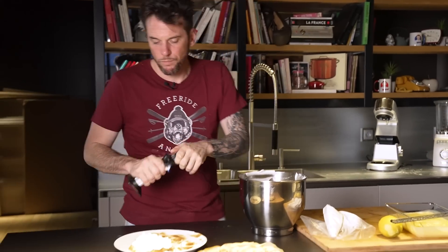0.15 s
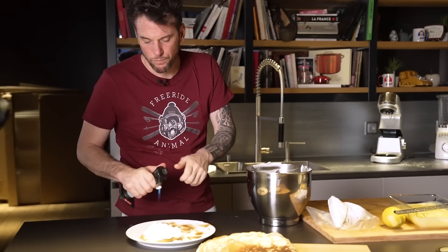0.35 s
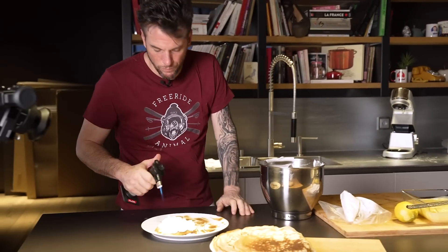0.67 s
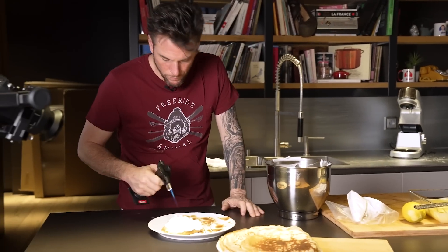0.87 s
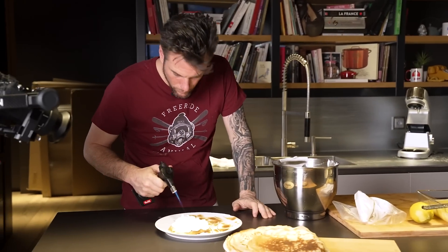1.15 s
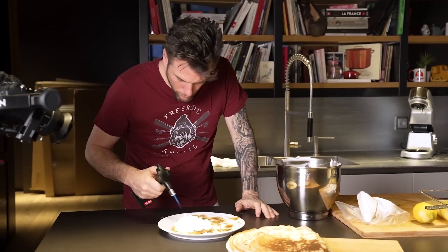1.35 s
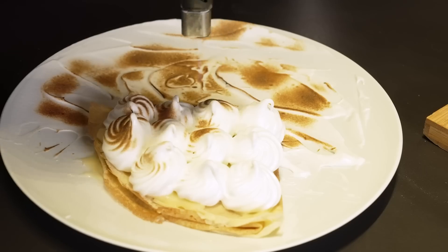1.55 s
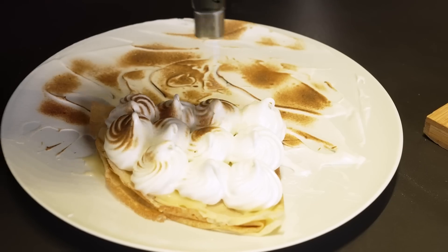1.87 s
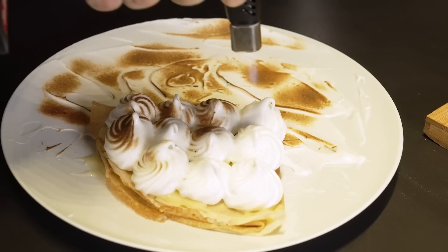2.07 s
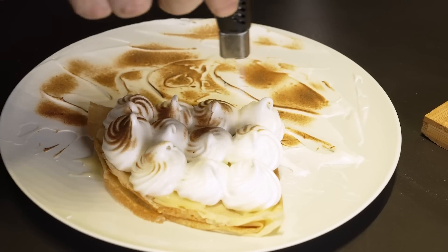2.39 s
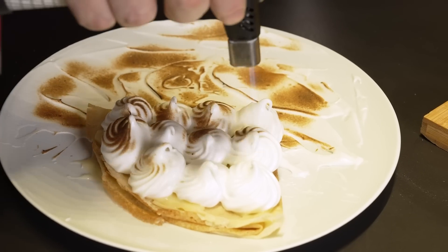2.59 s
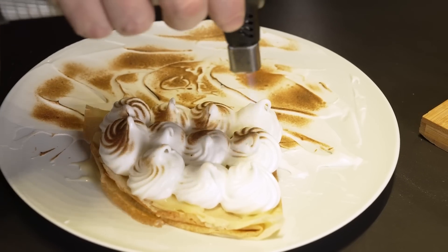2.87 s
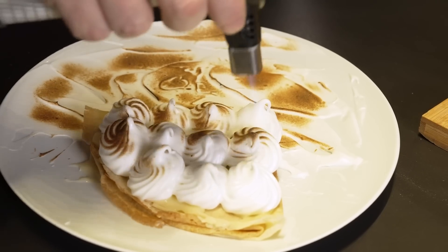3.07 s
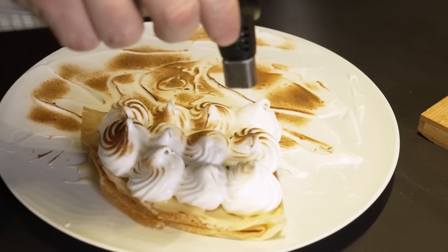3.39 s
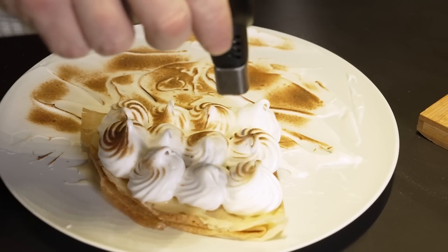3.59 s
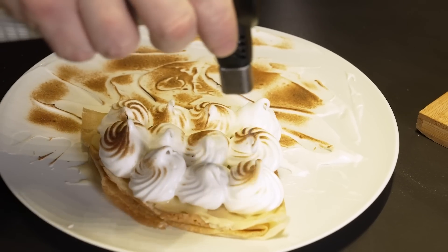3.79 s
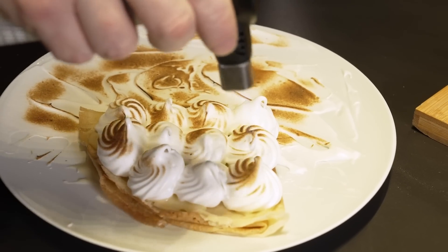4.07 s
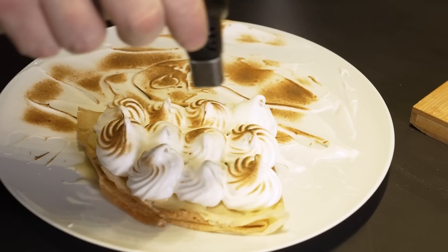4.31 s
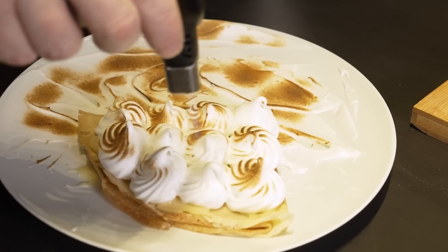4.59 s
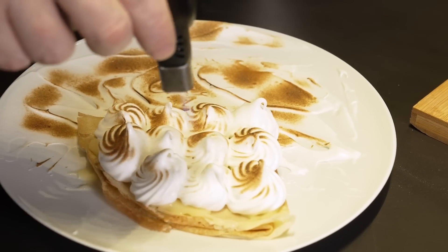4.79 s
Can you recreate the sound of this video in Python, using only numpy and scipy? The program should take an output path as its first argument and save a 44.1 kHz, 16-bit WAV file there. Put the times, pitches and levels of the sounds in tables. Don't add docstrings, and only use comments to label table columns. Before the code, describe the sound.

A small gas torch hisses, its igniter snaps and lights a steady flame, then close-up roaring bursts with little pops brown a topping.

```python
import sys
import numpy as np
from scipy import signal
from scipy.fft import rfft, irfft
from scipy.io import wavfile
from scipy.ndimage import uniform_filter1d

SR = 44100
rng = np.random.default_rng(int(sys.argv[2]) if len(sys.argv) > 2 else 0)


def how_loud(loudness_db):
    steps = np.asarray(loudness_db, float) / 20
    return 10 ** steps


def put_to_file(sound):
    columns = np.atleast_2d(sound).T
    safe = np.clip(columns, -1, 1)
    whole_steps = np.round(safe * 32767)
    wavfile.write(sys.argv[1], SR, whole_steps.astype(np.int16))


N = 218098

LIT_S, CLOSE_S = 0.221, 1.445

# full at t/s, leaves at t/s, roar level/dB, brightness/dB, sweep speed re usual
STRIKES = [(1.503, 1.599, -37, 1.5, 0.65), (1.627, 1.675, -47.5, 3, 0.67), (1.689, 1.762, -37.5, 0.5, 1),
           (1.956, 1.996, -44, 1, 0.78), (2.079, 2.13, -38.5, 1, 0.58), (2.17, 2.338, -37.5, -0.5, 0.24),
           (2.393, 2.606, -36, 0, .72), (2.886, 2.974, -37, -0.5, .7), (2.98, 3.158, -38.5, 0, 0.69),
           (3.489, 3.494, -53.5, 8, 1.3), (3.513, 3.535, -45.5, 1.5, 0.54), (3.563, 3.58, -47.5, 1.5, 0.84),
           (3.836, 3.86, -57, 1, 0.49), (3.999, 4.05, -41, 2, 0.53), (4.064, 4.258, -39, 5, 0.56),
           (4.32, 4.375, -39.5, 5.5, 1.08), (4.448, 4.583, -39.5, 2, 1.6), (4.682, 4.866, -36, 2, 1.14)]
# f/Hz, level/dB (per Hz)
ROAR_TONE = [(53, -45.5), (90, -24), (108, -21.5), (209, -14), (260, -7.5), (431, -8), (618, 0.5),
             (689, -2.5), (786, -4.5), (1000, -10), (1260, -14), (1420, -16), (1600, -17.5), (2080, -79),
             (3520, -120)]
RASP_TONE = [(1350, -43.5), (1600, -1), (1720, -3), (2010, -0.5), (2300, -6.5), (2780, -6), (3250, -10.5),
             (3940, -9), (4500, -16.5), (5850, -54), (9900, -120)]
HISS_TONE = [(2650, -36), (4500, -5), (5070, -2), (5740, -2), (7590, -1), (8550, -2.5), (10200, -4.5),
             (11400, -7), (12700, -7), (14000, -11.5), (15500, -16.5)]
# t/s, level/dB
COUNTER_BOOMS = [(1.64, -56), (1.76, -55), (1.97, -61.5), (2.18, -66), (2.33, -53), (2.53, -73),
                 (2.91, -55), (3.14, -63), (3.55, -64), (4.05, -57.5), (4.3, -51.5), (4.39, -58),
                 (4.47, -54.5), (4.58, -60), (4.7, -63), (4.85, -67)]
# t/s, peak level/dB
POPS = [(1.473, -44), (1.494, -28.5), (1.508, -22.5), (1.549, -26), (1.956, -38), (2.051, -35),
        (2.384, -24.5), (2.418, -30.5), (2.577, -26), (2.714, -45), (2.859, -37.5), (2.959, -37),
        (3.477, -37), (3.505, -36), (3.518, -36), (3.574, -47), (3.993, -24.5), (4.448, -25), (4.574, -27),
        (4.653, -42)]
# t/s, level/dB
HELD_RUMBLE = [
    (0.22, -58),
    (0.36, -53.5),
    (0.41, -58),
    (0.68, -53.5),
    (0.82, -57),
    (0.93, -52.5),
    (1.02, -55.5),
    (1.23, -49),
    (1.45, -52),
]
# f/Hz, level/dB (per Hz)
RUMBLE_TONE = [(53, -26), (90, -11), (156, -4), (391, 0.5), (458, -1.5), (628, -5), (714, -6.5), (852, -9),
               (950, -13.5), (1240, -61), (2090, -120)]
AIR_RUSH_TONE = [(800, -28), (990, -9.5), (1220, 1), (1400, -6.5), (1640, -2.5), (1820, -9.5), (2280, -8.5),
                 (2600, -17), (3120, -20), (3300, -19.5), (4290, -61), (7260, -120)]
COLD_JET_TONE = [(470, -62), (800, -18), (1080, -8), (1330, -13), (1980, -15), (2320, -15), (2760, -17),
                 (3130, -23.5), (5010, -8), (6920, -9.5), (8550, -25), (13900, -13), (15500, -30)]
BURNING_JET_TONE = [(1940, -58), (3300, -21), (3450, -12), (4010, -10.5), (4710, -5), (5610, -10),
                    (6100, -5), (6640, -8), (7610, -6), (8440, -9), (9300, -14.5), (9980, -8.5),
                    (11400, -9), (13400, -9.5), (15500, -16.5)]
# f/Hz, level/dB (per Hz)
IDLE_TONE = [(53, -42), (90, -21), (134, -14), (215, -14), (280, -5), (331, -11), (611, -1.5), (967, -23),
             (1130, -21), (1350, -42), (1630, -25), (2820, -44), (3500, -36), (4550, -64), (7700, -120)]
IDLE_JET_TONE = [(2060, -38), (3500, -29), (3680, -27), (4140, -14.5), (4960, -5), (5340, -11), (5940, -19),
                 (6990, -11.5), (7860, -6.5), (8210, -6.5), (10200, -7.5), (11100, -11), (12200, -9),
                 (13300, -15), (15500, -12)]
# t/s, peak level/dB, knock level re snap/dB, knock f/Hz, room level/dB
CLICKS = [
    (0.133, -57, 18.5, 493, -4),
    (0.185, -47, 13.5, 1570, -6),
    (0.1972, -45, 10, 1400, -20),
    (0.22, -7.5, -3.3, 1450, -9.5),
    (0.445, -46, 17.5, 1386, -6),
    (0.5054, -32.5, 8.5, 1270, -9.5),
    (1.297, -52, 5, 810, 0),
]
# f/Hz, level/dB (per Hz)
SNAP_TONE = [(35, -43), (110, -17), (450, -24), (756, -3), (1420, -14), (2840, -3), (3500, -16.5),
             (5080, 1), (8600, -14), (10300, -0.5), (11300, -10), (12400, -2.5), (13600, -13),
             (15500, -12.5)]
# t/s, middle band f/Hz, top band f/Hz, lift of these/dB, lift of the rim band/dB
TURN = [(0.0, 7350, 14450, 4, 1.5), (0.17, 8400, 14450, -4, 2.5), (0.62, 7960, 14450, 3, 1),
        (0.95, 7750, 13700, -1, 5.5), (1.15, 7550, 13300, 7, 7), (1.44, 7400, 13150, 4, 3),
        (1.7, 6950, 13200, 2.2, 2.5), (2.3, 7600, 13600, 2.5, 2), (2.72, 7900, 13750, 3.5, 5.5),
        (3.1, 7900, 13300, 5, 2), (3.4, 8000, 13600, 8.5, 12), (3.75, 8400, 13300, 4, 1),
        (4.0, 8100, 13200, 0, -0.5), (4.33, 7800, 13950, 1, 11), (4.55, 7600, 14050, 7.5, 8),
        (4.75, 7370, 14200, 10.5, 0), (4.95, 7900, 14050, -1, 0.7)]
# t/s, lower band f/Hz, upper band f/Hz, lift/dB
PLATE = [
    (1.44, 1430, 2600, -1),
    (1.72, 1430, 2500, 0),
    (2.0, 1340, 3020, 1.5),
    (2.5, 1390, 2680, 2),
    (3.15, 1400, 2760, 5),
    (4.1, 1580, 2880, 3),
    (4.38, 1540, 2920, 6),
    (4.47, 1640, 3230, 4),
    (4.7, 1690, 3500, 6.5),
    (4.95, 1630, 3400, 4.5),
]
BAND_WIDTHS = [260, 475, 580, 522, 400, 698, 320, 920]
# f/Hz, time to fall 60 dB/s
WALL_RING = [(100, 1), (1000, 0.33), (4000, 0.34), (15000, 0.33)]
# f/Hz, level/dB (per Hz)
WALL_TONE = [(120, -32), (200, -13), (423, -13), (526, -22), (862, -2.5), (944, -6), (1090, -1),
             (1820, -4.5), (2150, 3.5), (2980, -1), (3710, -6), (4300, 0.5), (12500, -16), (15700, -17)]
# f/Hz, level/dB (per Hz)
FLOOR_TONE = [(12, -27), (20, -3), (32, -7.5), (55, -12), (322, -12.5), (393, -12), (536, -11.5),
              (579, -15.5), (800, -17), (1040, -47), (1760, -120)]
# f/Hz, level/dB
SPREAD_TONE = [(30, -14), (120, -26.5), (400, -31.5), (1500, -34), (4000, -32.5), (15000, -32.5)]


def striking_flame():
    usual_db, lift_off_db, lift_off_s = -38, 2.5, 0.032
    start_s, leaves_s, level_db, bright_db, speed = np.transpose(STRIKES)

    def swelling(t):
        return level_db + lift_off_db * np.exp(-np.maximum(leaves_s - t, 0) / lift_off_s)

    roar_db, which = ramps(start_s, leaves_s, swelling, rise=607 * speed, fall=625 * speed)
    roar_db = np.maximum(roar_db, -62)
    bright_db = uniform_filter1d(bright_db[which], size=900)
    flutter, puffs = drift(16.7), drift(245)

    roar_flicker = 1.2 * flutter + 2.0 * puffs + 2.0 * drift(1260)
    roar = how_loud(roar_db) * turbulence(ROAR_TONE, roar_flicker)

    rasp_db = -54.5 + (roar_db - usual_db) + bright_db
    rasp_flicker = 1.1 * flutter + 1.36 * puffs + 1.4 * drift(33)
    rasp = how_loud(rasp_db) * turbulence(RASP_TONE, rasp_flicker)

    hiss_db = -59.0 + 0.81 * (roar_db - usual_db) + 0.78 * bright_db
    hiss_flicker = 0.92 * flutter + 1.3 * puffs + 0.27 * drift(12)
    hiss = how_loud(hiss_db) * turbulence(HISS_TONE, hiss_flicker)
    return step(CLOSE_S) * (roar + rasp + hiss + counter_boom()) + pops()


def counter_boom():
    s, level_db = np.transpose(COUNTER_BOOMS)
    boom_db, _ = ramps(s, s, lambda t: level_db, rise=300, fall=180)
    return how_loud(np.maximum(boom_db, -74.5)) * rms_one(band_noise(117, 125, N))


def pops():
    clicks = np.zeros(N)
    s, peak_db = np.transpose(POPS)
    clicks[(s * SR).astype(int)] = -how_loud(peak_db - 1.5)
    pulse = coloured(np.arange(SR // 20) == 0, ROAR_TONE)
    return signal.fftconvolve(clicks, pulse / np.abs(pulse).max())[:N]


def held_torch():
    t, lit = np.arange(N) / SR, step(LIT_S)
    rumble_db, = in_time(HELD_RUMBLE)
    rumble = how_loud(rumble_db) * turbulence(RUMBLE_TONE, 0.99 * drift(60) + 1.9 * drift(8.0))

    fade_db = 14 * np.clip(t - LIT_S - 0.56, 0, 0.4)
    rush_db = -57.5 + 0.6 * (rumble_db - rumble_db.mean()) - fade_db
    rush = how_loud(rush_db) * turbulence(AIR_RUSH_TONE, 0.6 * drift(73) + 0.87 * drift(3.4))

    cold_db = -65.5 + 18 * np.minimum(t, LIT_S)
    cold = how_loud(cold_db) * turbulence(COLD_JET_TONE, 0.63 * drift(29.7))
    burning = how_loud(-65.5 + t) * turbulence(BURNING_JET_TONE, 0.5 * drift(30))
    return (lit * (rumble + rush + burning) + (1 - lit) * cold) * (1 - step(CLOSE_S))


def idle_flame():
    rumble = how_loud(-57.5) * turbulence(IDLE_TONE, 0.8 * drift(54) + 1.2 * drift(3.8))
    jet_db = -69 + 0.6 * in_time(PLATE)[-1]
    jet = how_loud(jet_db) * turbulence(IDLE_JET_TONE, 0.91 * drift(30))
    return step(CLOSE_S) * (rumble + jet)


def igniter(room):
    t = np.arange(round(0.014 * SR)) / SR
    dry, sent = np.zeros(N), np.zeros(N)
    for s, peak_db, knock_db, knock_hz, room_db in CLICKS:
        dulling = [(4000, 0), (16000, 0.3 * (peak_db + 9.0))]
        snap = coloured(coloured(rattle(t), SNAP_TONE), dulling)
        knock = np.sin(2 * np.pi * knock_hz * t) * how_loud(-60 * t / 0.015 - 11.5 + knock_db)
        at = round((s - 0.0004) * SR)
        dry[at:at + len(t)] += how_loud(peak_db) * (snap / np.abs(snap).max() + knock)
        sent[at] += how_loud(peak_db + room_db + 16.0)
    return dry + catching_gas() + signal.fftconvolve(sent, room)[:N]


def rattle(t):
    noise = rng.standard_normal(len(t)) * np.clip(t / 0.0008, 0, 1) / (1 + (t / 0.003) ** 4)
    chatter = rfft(noise)
    even = irfft(chatter / uniform_filter1d(np.abs(chatter), size=5), len(t))
    return even * np.clip(t / 0.0003, 0, 1) / (1 + (t / 0.005) ** 6)


def catching_gas():
    whoomp_hz = 114
    since = np.maximum(np.arange(N) / SR - LIT_S, 0)
    whoomp = rms_one(band_noise(1.1 * whoomp_hz, 1.36 * whoomp_hz, N))
    whoomp = whoomp * step(LIT_S) * how_loud(-50.5 - 60 * since / 0.45)
    thud = how_loud(-39.5 - 60 * since / 0.078) * np.sin(2 * np.pi * whoomp_hz * since)
    return whoomp + thud


def interference(x):
    hz, s, frames = signal.stft(x, SR, nperseg=512)
    patches = uniform_filter1d(rng.standard_normal(frames.shape), size=3, axis=0)
    patches = uniform_filter1d(patches, size=50, axis=1)
    lift_db = 1.1 * rms_one(patches) * (hz[:, None] > 1000)
    for (centre_hz, top_db), width_hz in zip(bright_bands(s), BAND_WIDTHS):
        off = ((hz[:, None] - centre_hz) / width_hz) ** 2
        lift_db = lift_db + top_db * (1 - off) * np.exp(-off / 2)
    shaped = signal.istft(frames * how_loud(lift_db), SR, nperseg=512)[1][:N]
    t = np.arange(SR // 20) / SR
    echoes = rng.standard_normal(len(t)) * np.exp(-t / 0.012) * (t > 0.002)
    echoes = echoes / np.sqrt(np.sum(echoes ** 2))
    return shaped + how_loud(-14) * signal.fftconvolve(shaped, echoes)[:N]


def bright_bands(s):
    frame, close = np.minimum((s * SR).astype(int), N - 1), s > CLOSE_S
    middle_hz, top_hz, glare_db, rim_db = np.array(in_time(TURN))[:, frame]
    lower_hz, upper_hz, plate_db = np.array(in_time(PLATE))[:, frame]
    return [(4750, ~close * 4.0),
            (5150, close * (-2.5 - 0.34 * plate_db)),
            (middle_hz, glare_db),
            (11200, rim_db),
            (top_hz, 0.9 * glare_db),
            (upper_hz, 1.02 * close * plate_db),
            (lower_hz, close * plate_db),
            (6300, 0.52 * close * plate_db)]


def walls():
    t, out = np.arange(SR) / SR, 0
    for low in 60 * 2 ** np.arange(8):
        out = out + band_noise(low, 2 * low, SR) * how_loud(-60 * t / at_hz(WALL_RING, np.sqrt(2) * low))
    out = coloured(out * np.clip(t / 0.0049, 0, 1), WALL_TONE)
    return out / np.sqrt(np.sum(out ** 2))


def room_hum():
    hum = how_loud(-77.5) * np.sqrt(2) * np.sin(2 * np.pi * 47.6 * np.arange(N) / SR)
    return how_loud(-73.5) * turbulence(FLOOR_TONE, 2.4 * drift(10)) + hum


def turbulence(tone, flicker_db):
    return rms_one(coloured(rng.standard_normal(N) * how_loud(flicker_db), tone))


def drift(rate_hz):
    r = np.exp(-2 * np.pi * rate_hz / SR)
    wander = signal.lfilter([1], [1, -2 * r, r * r], rng.standard_normal(N + SR))
    return rms_one(wander[SR:])


def band_noise(low_hz, high_hz, size):
    band = signal.butter(2, [low_hz, high_hz], "band", fs=SR, output="sos")
    return signal.sosfilt(band, rng.standard_normal(size))


def coloured(x, tone):
    size = 8192
    hz = np.arange(1, size // 2 + 2) * SR / size
    cepstrum = irfft(np.log(how_loud(np.maximum(at_hz(tone, hz), -120))))
    cepstrum[1:size // 2] *= 2
    cepstrum[size // 2 + 1:] = 0
    return signal.fftconvolve(x, irfft(np.exp(rfft(cepstrum))))[:len(x)]


def ramps(start_s, end_s, top_db, rise, fall):
    t = np.arange(0, N + 64, 64)[:, None] / SR
    below_db = np.maximum(0, np.maximum(rise * (start_s - t), fall * (t - end_s)))
    shapes = top_db(t) - below_db
    at = np.arange(N) / 64
    loudest_db = np.interp(at, np.arange(len(t)), shapes.max(axis=1))
    return loudest_db, shapes.argmax(axis=1)[at.astype(int)]


def step(s):
    return np.clip((np.arange(N) / SR - s) * 250, 0, 1)


def in_time(rows):
    s, *columns = np.transpose(rows)
    return [np.interp(np.arange(N) / SR, s, c) for c in columns]


def at_hz(points, hz):
    points = np.array(points)
    return np.interp(np.log(hz), np.log(points[:, 0]), points[:, 1])


def rms_one(x):
    return x / np.sqrt(np.mean(x ** 2) + 1e-20)


def scene():
    room = walls()
    flame = striking_flame()
    torch = interference(held_torch() + idle_flame() + flame)
    flame_echo = how_loud(-18) * signal.fftconvolve(flame, room)[:N]
    mid = igniter(room) + torch + flame_echo + room_hum()
    side = how_loud(-43.0) * coloured(rng.standard_normal(N), SPREAD_TONE)
    return mid + side * [[1], [-1]]


def low_pass(x):
    return signal.sosfilt(signal.butter(12, 16890, fs=SR, output="sos"), x)


def record(dry):
    steep = signal.ellip(10, 0.2, 29, 15750, fs=SR, output="sos")
    deep = signal.cheby2(14, 50, 17300, fs=SR, output="sos")
    mix = signal.sosfilt(deep, signal.sosfilt(steep, dry))
    return low_pass(mix)


dry = scene()
out = record(dry)
put_to_file(out)
```